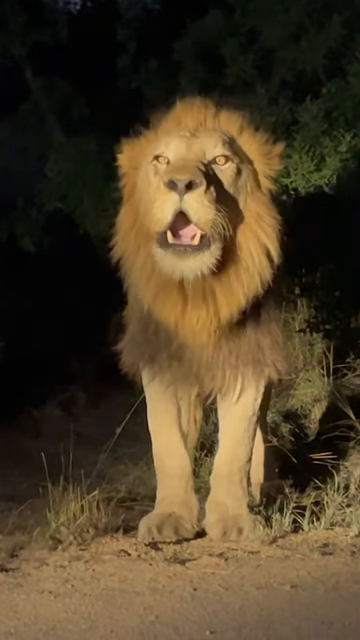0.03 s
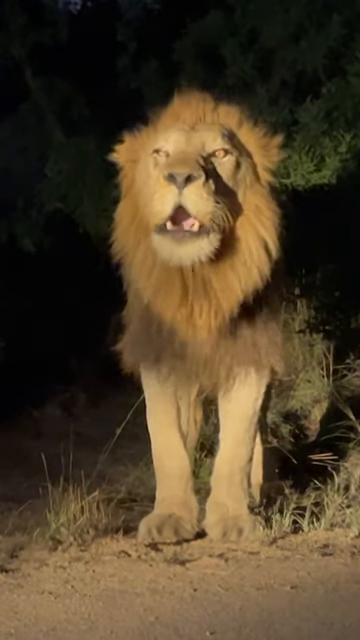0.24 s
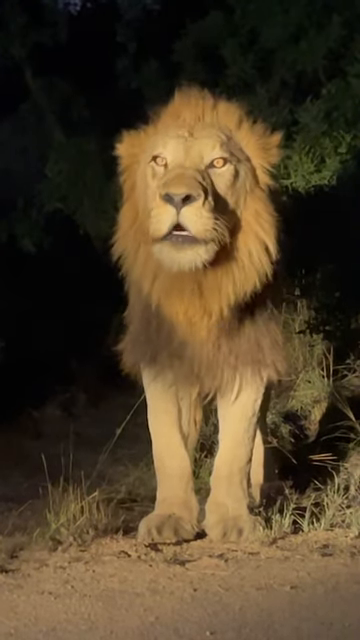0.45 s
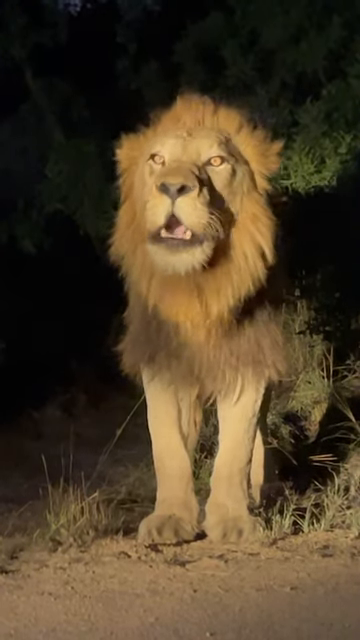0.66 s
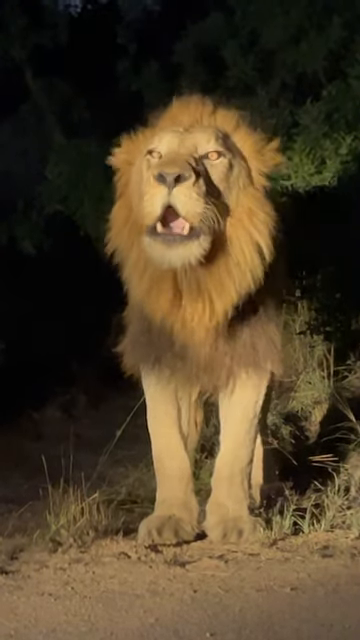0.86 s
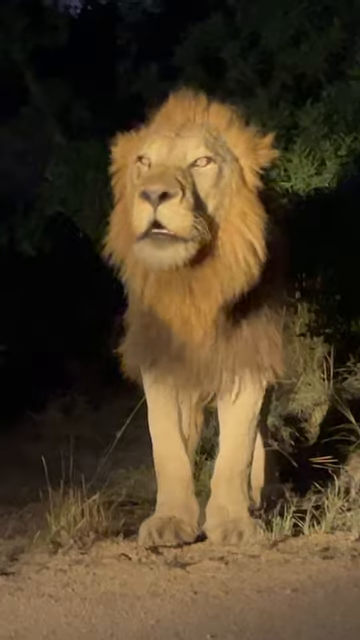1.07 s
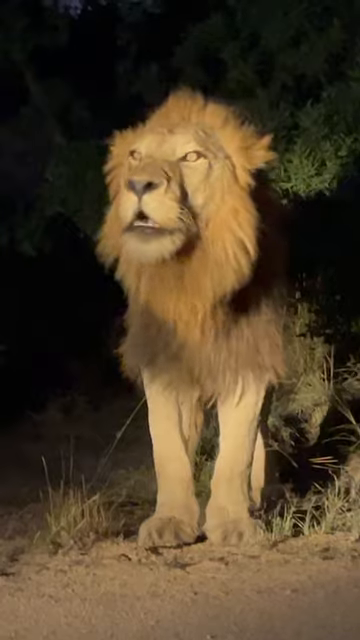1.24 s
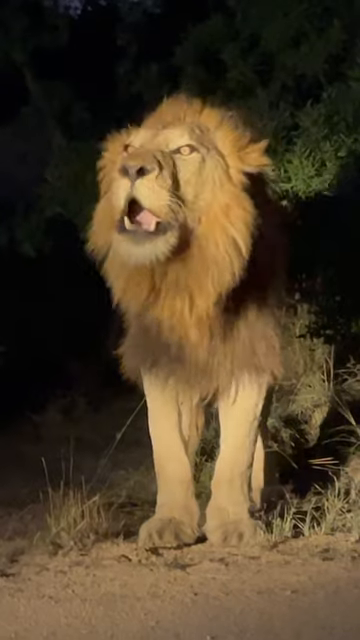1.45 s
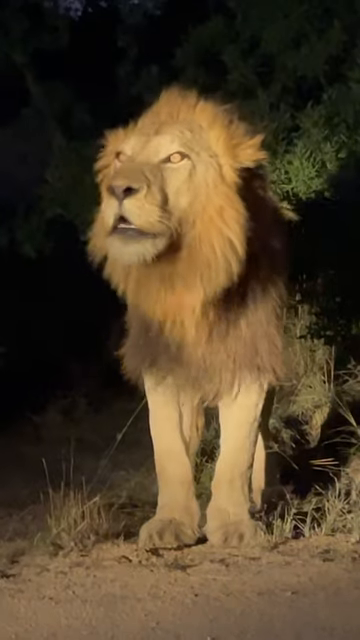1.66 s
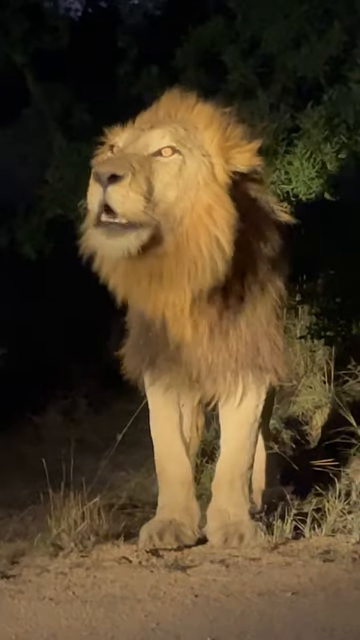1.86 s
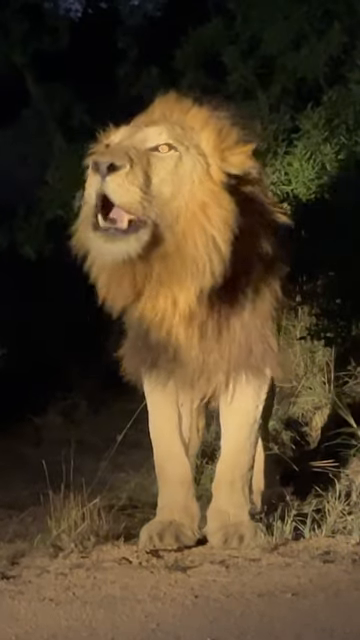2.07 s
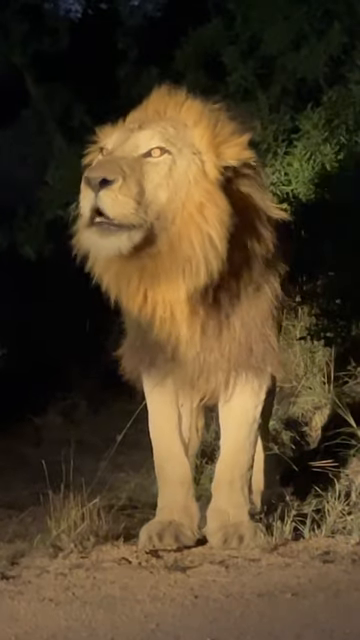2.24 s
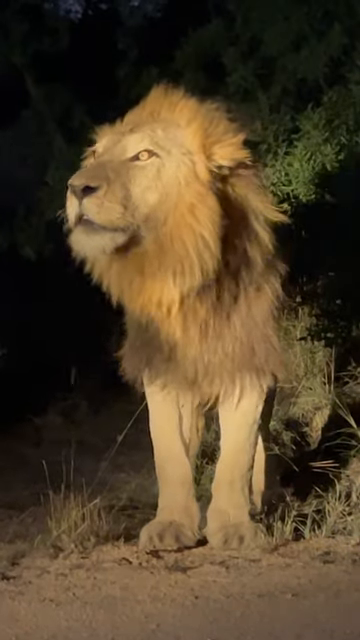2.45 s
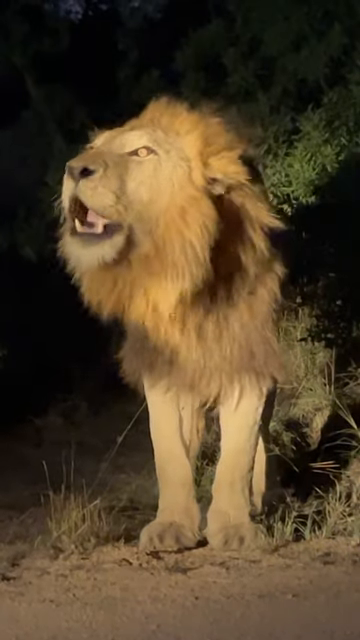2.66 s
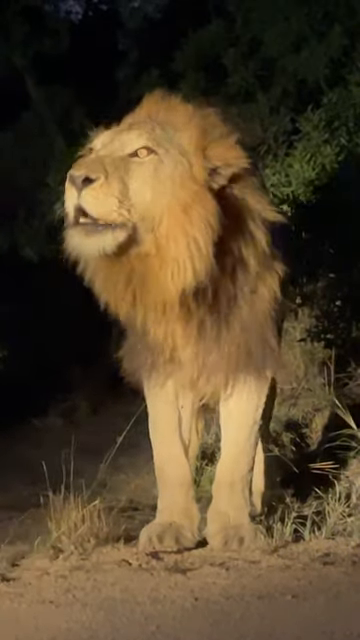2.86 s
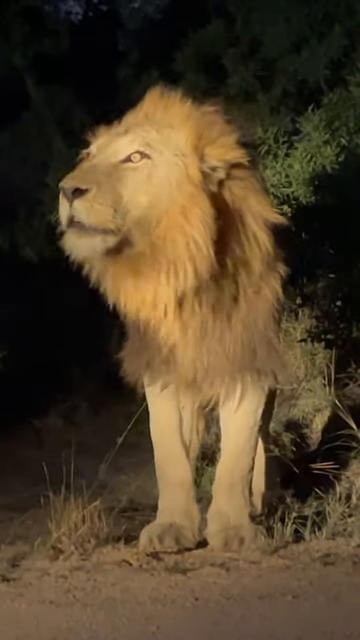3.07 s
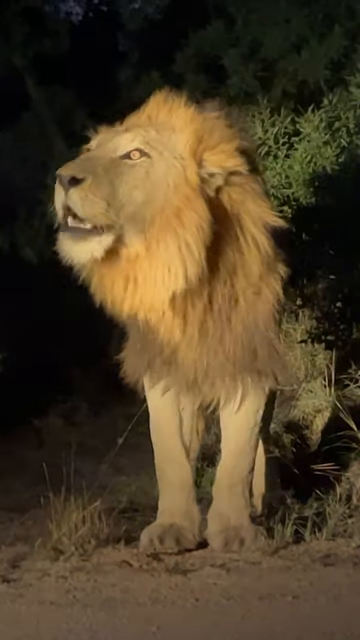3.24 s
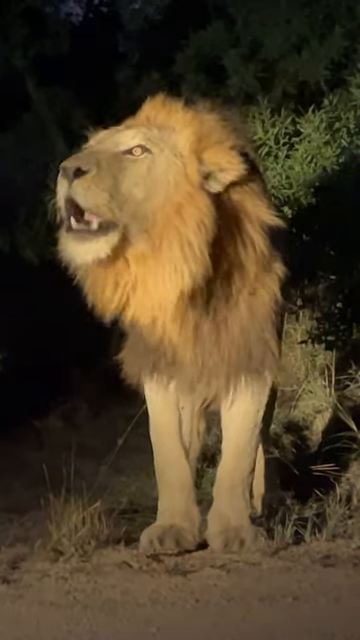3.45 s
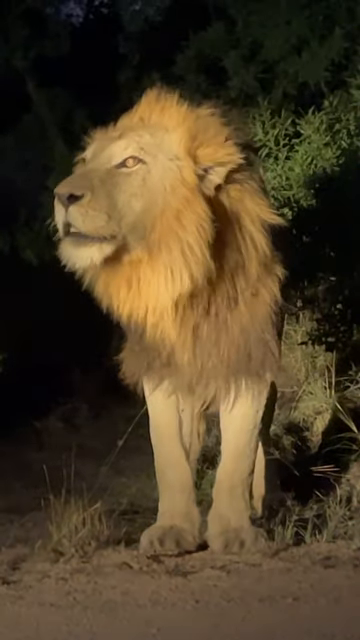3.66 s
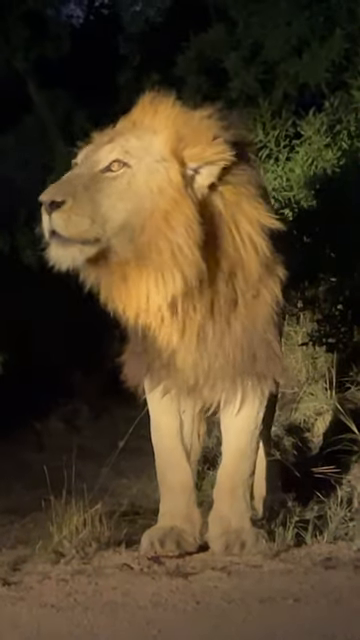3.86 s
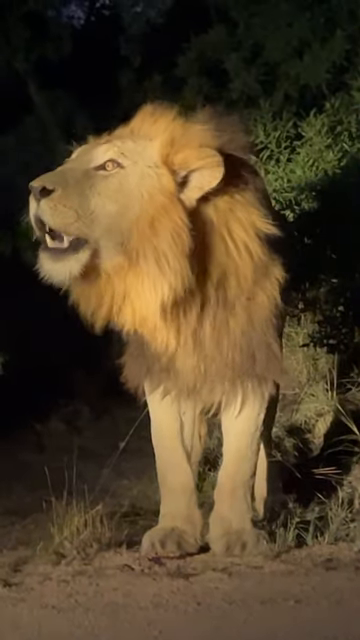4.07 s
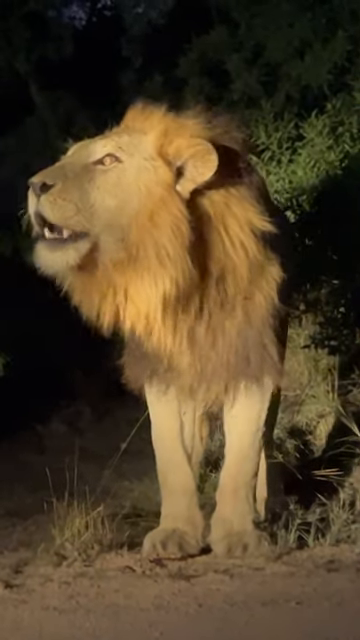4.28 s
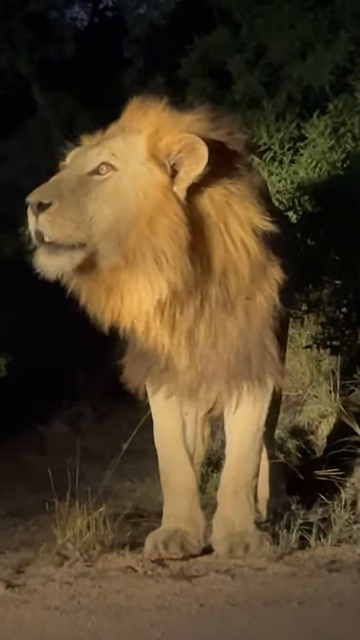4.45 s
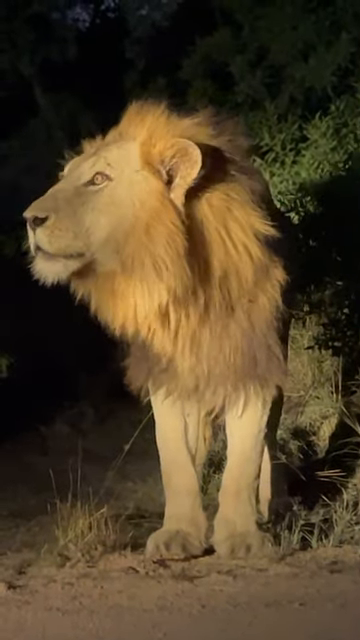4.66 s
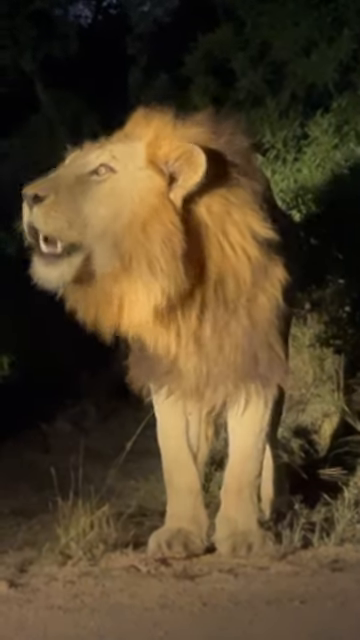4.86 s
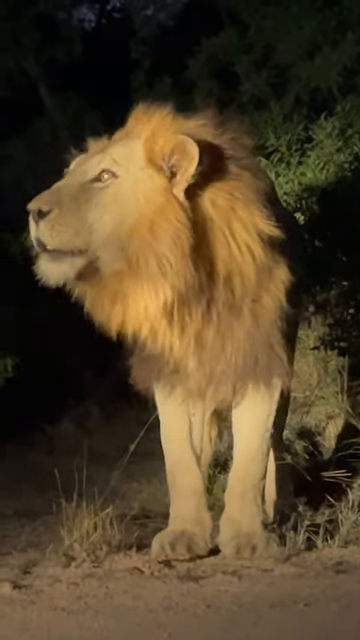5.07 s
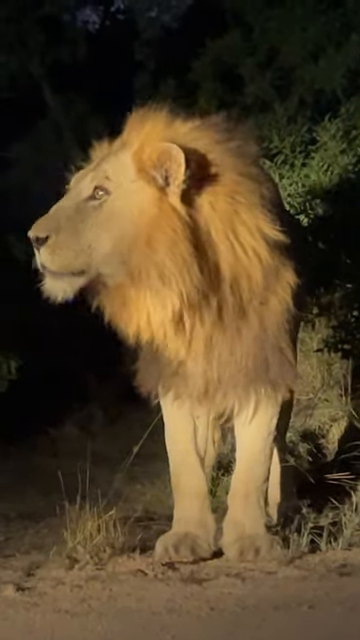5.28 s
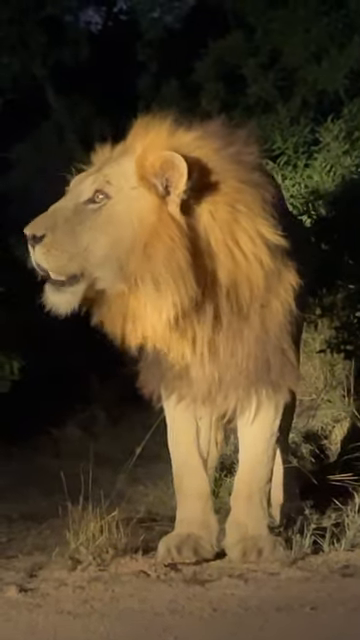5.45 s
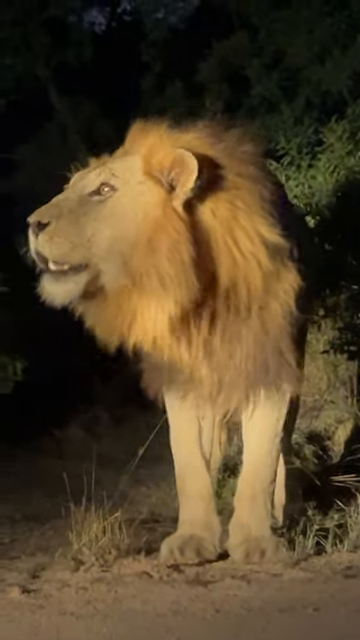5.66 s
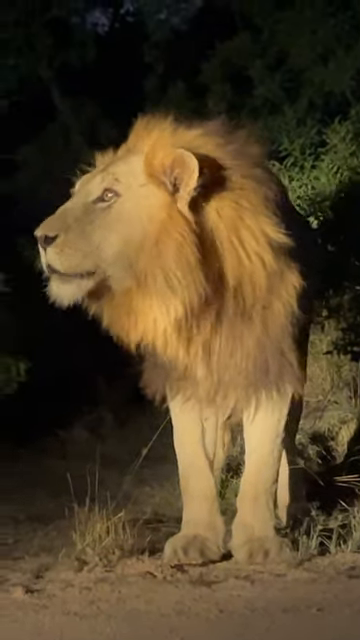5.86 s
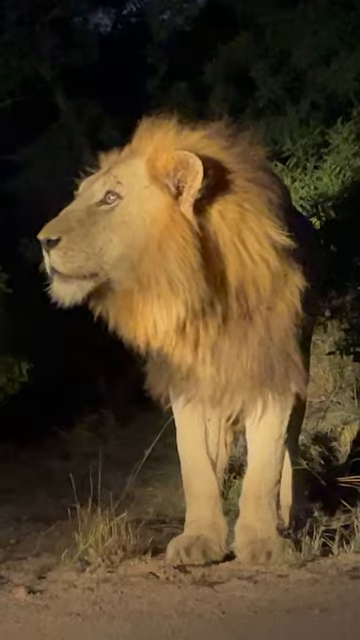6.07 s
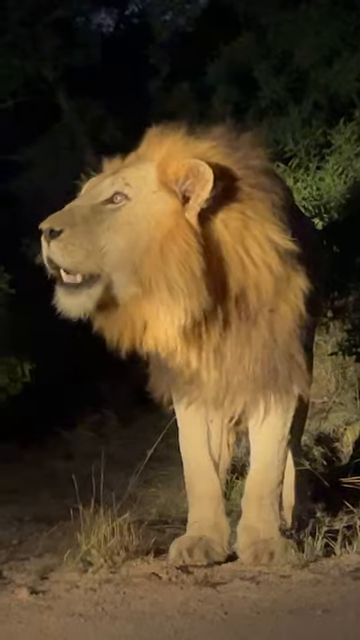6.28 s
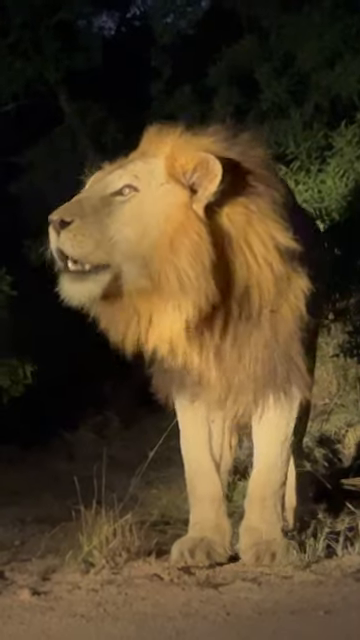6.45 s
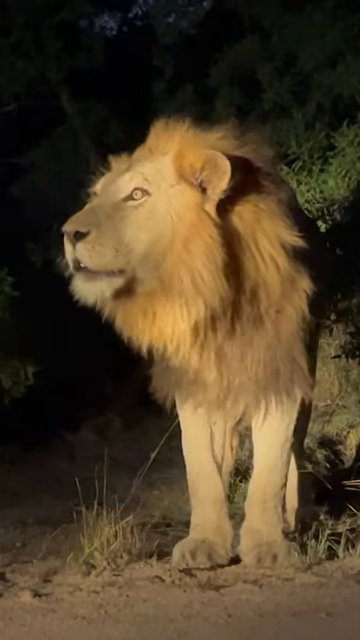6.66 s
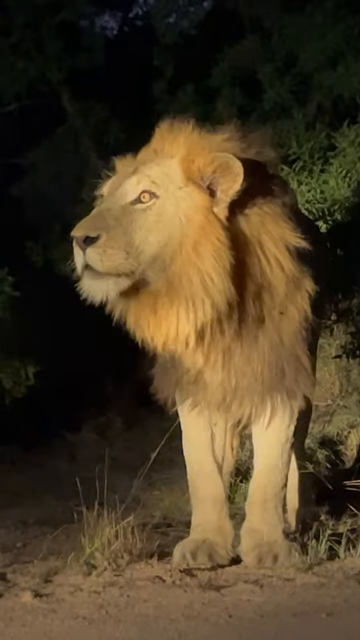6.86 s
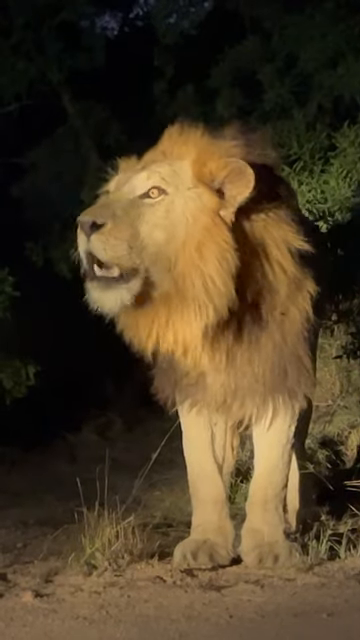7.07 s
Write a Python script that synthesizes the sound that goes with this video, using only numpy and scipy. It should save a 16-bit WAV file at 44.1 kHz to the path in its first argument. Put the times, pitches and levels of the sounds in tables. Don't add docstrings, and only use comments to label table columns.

```python
import sys
import numpy as np
from scipy import signal
from scipy.fft import rfft, irfft, next_fast_len
from scipy.io import wavfile
from scipy.ndimage import uniform_filter1d, minimum_filter1d

SR = 44100
rng = np.random.default_rng(int(sys.argv[2]) if len(sys.argv) > 2 else 0)


def volts_from_db(level):
    exponent = np.asarray(level, float) / 20
    return 10 ** exponent


def master(y):
    cut = np.clip(np.atleast_2d(y).T, -1, 1)
    pcm = np.round(cut * 32767)
    wavfile.write(sys.argv[1], SR, pcm.astype(np.int16))


N = 313992

TURN_S = 5.3
RELEASE_S = .09

# full voice at [s], push length [s], tail length [s], fold rate [Hz], push level [dB].
GRUNTS = [(0.102, 0.097, 0.14, 164, -2.5), (0.775, .086, 0.097, 159.7, -3.5),
          (1.391, 0.054, 0.11, 156, -4.5), (2.013, 0.064, 0.12, 161, -4), (2.682, 0.07, 0.13, 158, -3.5),
          (3.369, 0.088, 0.12, 158, -4), (4.166, .082, 0.16, 159.7, -0.5), (4.883, .065, .125, 150.2, -6),
          (5.582, .048, 0.089, 149, -7), (6.36, 0.058, 0.16, 147, -7.5), (7.135, 0.046, .12, 137, 0.5)]
# last gust of air at [s], gust level [dB], airflow of the push [dB],
# tail tone [dB], lingering rumble [dB].
LETTING_GO = [(0.25, -27, -17, -15, -44.5), (0.915, -26.5, -19.5, -13, -46.5),
              (1.486, -24.5, -18.5, -13.5, -53), (2.132, -26, -17, -13, -47.5),
              (2.818, -27, -19, -13.5, -48), (3.484, -25, -18, -13.5, -48), (4.302, -26, -17, -12.5, -43.5),
              (5.02, -34.5, -23, -16.5, -61), (5.71, -33.5, -27, -24.5, -57),
              (6.466, -29, -24.5, -24.5, -52), (7.24, -29, -26.5, -24, -49)]


def rms_one(x):
    return x / np.sqrt(np.mean(x ** 2) + 1e-20)


def evened(x, span_s):
    return x / np.sqrt(uniform_filter1d(x ** 2, int(span_s * SR)) + 1e-12)


def drift(rate_hz):
    r = np.exp(-2 * np.pi * rate_hz / SR)
    wander = signal.lfilter([1], [1, -2 * r, r * r], rng.standard_normal(N + SR))
    return rms_one(wander[SR:])


def at_hz(points, size):
    hz = np.maximum(np.arange(size // 2 + 1) * SR / size, 1)
    table_hz, values = np.array(points).T
    return np.interp(np.log(hz), np.log(table_hz), values)


def coloured(x, spectrum):
    size = next_fast_len(N)
    shaped = rfft(x, size) * volts_from_db(at_hz(spectrum, size))
    return rms_one(irfft(shaped, size)[..., :N])


def band_pass(x, low_hz, high_hz, order=3):
    return signal.sosfilt(signal.butter(order, [low_hz, high_hz], "band", fs=SR, output="sos"), x)


def resonances(x, modes, patchy_db):
    out = 0
    for k, (hz, width_hz, db) in enumerate(modes):
        r = np.exp(-np.pi * width_hz / SR)
        feedback = [1, -2 * r * np.cos(2 * np.pi * hz / SR), r * r]
        gain = (-1) ** k * volts_from_db(db + patchy_db * drift(7.9))
        out = out + gain * signal.lfilter([(1 - r * r) / 2, 0, (r * r - 1) / 2], feedback, x)
    return out


def in_time(tables, quiet):
    rows = []
    for table in tables:
        first, last = table[0], table[-1]
        before, after = [[v if q is None else q for v, q in zip(row[1:], quiet)] for row in (first, last)]
        rows += [(first[0] - .015, *before), *table, (last[0] + .03, *after)]
    s, *columns = np.transpose(rows)
    return [np.interp(np.arange(N) / SR, s, column) for column in columns]


def swells(times, peaks_db, rise_db_per_s, fall_db_per_s):
    late = np.arange(0, N + 64, 64)[:, None] / SR - times
    db = np.max(peaks_db + np.minimum(rise_db_per_s * late, -fall_db_per_s * late), axis=1)
    return volts_from_db(np.interp(np.arange(N) / 64, np.arange(len(db)), db))


def night():
    # frequency [Hz], level [dB per Hz].
    air_spectrum = [(25, -2.5), (85, -12), (170, -19), (800, -19.5), (1400, -40.5), (4500, -51.5),
                    (8000, -72), (11500, -53), (15000, -64)]
    air = volts_from_db(-69.5) * coloured(rng.standard_normal((2, N)), air_spectrum)
    wing_beat = np.sin(2 * np.pi * 70 * np.arange(N) / SR + 2 * drift(8))
    trill = (1 + .6 * wing_beat) * volts_from_db(1.8 * drift(8.5))
    cricket_hz = 6200
    chirps = band_pass(rng.standard_normal((2, N)), cricket_hz - 300, cricket_hz + 300)
    return air + volts_from_db(-71.5) * rms_one(trill * chirps)


def pauses():
    # peak at [s], air level [dB], rumble level [dB].
    breath_times = [(0.004, -51, -43), (0.658, -40, -42), (1.271, -41.5, -41.5), (1.876, -37.5, -39.5),
                    (2.555, -39.5, -41), (3.247, -39, -42.5), (4.024, -37, -38), (4.62, -74, -51),
                    (5.456, -53, -82), (6.231, -48, -58.5), (7.018, -52, -53)]
    # frequency [Hz], level [dB per Hz].
    breath_spectrum = [(150, -36.5), (250, -12.5), (552, -16.5), (642, -8), (1220, -17), (1390, -8.5),
                       (2020, -21), (3180, -27), (7900, -36), (8590, -40.5), (14000, -45.5)]
    # frequency [Hz], level [dB per Hz].
    rumble_spectrum = [(15, -52), (25, -23.5), (40, -5.5), (119, -2), (162, 4), (188, -12), (300, -25.5),
                       (390, -43.5), (660, -120)]
    # frequency [Hz], width [Hz], level [dB].
    windpipe = [(400, 60, -3.5), (590, 23, -2.5), (833, 110, -9), (1296, 220, -6), (2050, 1100, -25),
                (2800, 200, -2.5), (3150, 130, -9)]
    draw_db_per_s, stop_db_per_s = 273, 472
    s, air_db, stir_db = np.transpose(breath_times)
    ends = np.array([at + push + tail + RELEASE_S for at, push, tail, _, _ in GRUNTS])
    linger = swells(ends, np.transpose(LETTING_GO)[4], stop_db_per_s, 81.5)
    drawn = swells(s, air_db, stop_db_per_s, stop_db_per_s)
    drawn = drawn + swells(s - 0.034, air_db - 18, draw_db_per_s, draw_db_per_s)
    drawn = drawn + volts_from_db(-32) * linger + volts_from_db(-75)
    stirred = swells(s, stir_db, 175, 107.5) + linger
    air = coloured(rng.standard_normal(N) * volts_from_db(2.0 * drift(60)), breath_spectrum)
    breath = .55 * air + 2 * resonances(air, windpipe, 4.5)
    rumble = coloured(rng.standard_normal(N), rumble_spectrum)
    return drawn * evened(breath, 0.073) + stirred * evened(rumble, 0.07)


def ticks():
    # start [s], peak level [dB], low edge of its band [Hz].
    tick_list = [
        (2.744, -39, 7600),
        (4.149, -23.5, 300.3),
        (4.966, -17.5, 400),
        (7.11, -27.5, 400),
        (6.085, -31, 80),
        (6.135, -34.5, 80),
        (6.177, -32, 78.5),
    ]
    out, t = np.zeros(N + SR), np.arange(int(.07 * SR)) / SR
    for s, db, low_hz in tick_list:
        snap = volts_from_db(db - 60 * t / 0.012) * rng.standard_normal(len(t))
        at = int(s * SR)
        out[at:at + len(t)] += 4.7 * band_pass(snap, low_hz, min(3 * low_hz, 14000), order=2)
    return out[:N]


def slaps():
    # start [s], peak level [dB], chest thump against it [dB],
    # throat pitch [Hz].
    slap_list = [(0.501, -39, -11.5, 597), (4.573, -24, -22.5, 747), (4.659, 0, -5.5, 806),
                 (4.6985, -1.5, -6, 850), (4.784, -5, -3, 664), (4.823, -5, -3.5, 702),
                 (4.849, -7, -12, 740), (4.871, -10, 0, 579), (6.079, -57, -5, 653), (6.128, -54, -3, 628),
                 (6.175, -63, -6, 687)]
    # share of the throat pitch [ratio], level [dB], time to fall 60 dB [s].
    slap_modes = [(1.0, 8, 0.017), (0.59, -12, 0.02), (0.18, -14.5, 0.063), (0.71, -1.5, 0.014),
                  (1.25, -16, 0.033), (1.6, -20.5, .02), (2.3, -30, .015), (9.9, -30, .012)]
    out, t = np.zeros(N + SR), np.arange(int(.07 * SR)) / SR
    late = np.maximum(t - .006, 0)
    thump = np.sin(2 * np.pi * (58 * late + 1.22 * (1 - np.exp(-late / .016))) - .8)
    thump *= 1.3 * (1 - np.exp(-(late / .002) ** 2)) * np.exp(-late / .012)
    glide_s = 0.0052
    for s, db, thump_db, hz in slap_list:
        ring = sum(volts_from_db(level_db - 60 * t / t60) * np.sin(2 * np.pi * ratio * hz * t)
                   for ratio, level_db, t60 in slap_modes)
        glide = 126.7 * t + hz * glide_s * (1 - np.exp(-t / glide_s))
        ring += volts_from_db(-5.5 - 60 * t / 0.1) * np.sin(2 * np.pi * glide)
        crack = volts_from_db(-44 - 60 * t / 0.0051) * rng.standard_normal(len(t))
        onset = (1 - np.exp(-t / 0.0014)) ** 2
        at = int(s * SR)
        out[at:at + len(t)] += volts_from_db(db) * (ring * onset + crack + volts_from_db(thump_db + 3.5) * thump)
    return out[:N]


def voicing():
    tables = []
    for (s, push, tail, hz, db), (_, _, _, tail_db, _) in zip(GRUNTS, LETTING_GO):
        shut = s > TURN_S
        tired = s + push
        end = tired + tail
        tables.append([
            (s - .05, hz, db - 49),
            (s - 0.021, hz, db - 15 - 12 * shut),
            (s, hz, db - 3),
            (s + .026, hz, db),
            (s + .72 * push, .94 * hz, db - 3.4),
            (tired, .88 * hz, db - 2.5),
            (tired + .028, .75 * hz, tail_db - 1.5 - 4.5 * shut),
            (tired + .65 * tail, .67 * hz, tail_db),
            (end, .56 * hz, tail_db - 6),
            (end + .04, 80.8, tail_db - 16),
            (end + RELEASE_S, 80.8, tail_db - 47)])
    return tables


def airflow():
    tables = []
    for (s, push, tail, _, _), (gust, gust_db, flow_db, _, _) in zip(GRUNTS, LETTING_GO):
        shut = np.array([-37, 0, 4]) * (s > TURN_S)
        sag = max(s + push + tail, gust + 0.06)
        s = s - .014 * (s > TURN_S)
        stages = [
            (s - 0.048, flow_db, (-43.5, -52, -55)),
            (s - 0.035, flow_db, (-12, -20, -39.5)),
            (s, flow_db + shut / 2, (-4.5, -5, -21)),
            (s + 0.04, flow_db + shut, (-5.5, 0, -14.5)),
            (gust - 0.044, gust_db, (-0.5, 0, -9.5)),
            (gust, gust_db, (-0.87, 0, -5.5)),
            (gust + 0.018, gust_db, (-2.5, -4.5, -13.5)),
            (sag, gust_db, (-16, -15.5, -26.5)),
            (sag + RELEASE_S, gust_db, (-46.5, -43, -48))]
        tables.append([(at, *np.add(db, shares)) for at, db, shares in stages])
    return tables


def chest_tone(pitch_hz, cycle, effort, bright):
    # multiple of the fold rate [ratio], level under the chest tone [dB].
    clean_overtones = [(2, -31), (3, -20.5), (4, -30), (5, -23), (7, -31)]
    octave = 0.28 / (1 + ((2 * pitch_hz - 164) / 38) ** 2)
    swing = np.sin(2 * np.pi * cycle)
    swing = swing + octave * volts_from_db(3 * drift(19)) * np.sin(4 * np.pi * cycle + 1.8 * drift(14))
    flutter_spectrum = [(25, -22.5), (55, -5.5), (90, 0), (200, 4.5), (280, -40.5)]   # Hz, dB per Hz
    flutter = volts_from_db(-22.5) * coloured(rng.standard_normal(N), flutter_spectrum)
    chest = np.sqrt(2) * swing * volts_from_db((1.6 - 1.3 * effort) * drift(40)) + flutter
    for k, db in clean_overtones:
        level = np.sqrt(2) * volts_from_db(db + 4 * drift(18))
        chest = chest + bright * level * np.sin(2 * np.pi * k * cycle + 2.1 * k + .11 * k * drift(25))
    return chest


def throat_rasp(cycle, gate, effort, bright):
    # resonance [Hz], width [Hz], level [dB].
    throat_open = [(220, 76, -13.5), (357.2, 43, -1.5), (524, 79, -4.5), (587, 120, -5.5), (763, 150, -4),
                   (1031.3, 15, -1), (1340, 120, -7.5), (1584, 390, -19.5)]
    # resonance [Hz], width [Hz], level [dB].
    throat_shut = [(213, 60, 1.5), (376, 67.7, 1.5), (568.2, 41, -9.5), (863, 55, -8.5), (1034, 29, -5),
                   (1387.3, 270, -17.5), (1820, 190, -21)]
    start = rng.uniform(0, 2 * np.pi, 9)
    overtones = sum(np.sin(2 * np.pi * k * cycle + start[k] + .1 * k * drift(25)) / 2 for k in range(3, 8))
    source = (.05 + .34 * effort ** 2 - .22 * bright) * overtones + rms_one(gate * rng.standard_normal(N))
    facing = resonances(source, throat_open, 2.2)
    aside = resonances(source, throat_shut, 2.2)
    return np.where(np.arange(N) < TURN_S * SR, facing, aside)


def mouth_hiss(gate):
    # frequency [Hz], level [dB per Hz].
    hiss_spectrum = [(1120, -36), (1900, -6.5), (2250, -2), (2580, -2.5), (3540, -2), (4230, -14),
                     (4690, -13), (5450, -15), (6000, -17.5), (8020, -7.5), (8610, -34.5), (9480, -15.5),
                     (10600, -14.5), (12100, -19.5), (15500, -32)]
    # frequency [Hz], width [Hz], level [dB].
    mouth = [(2256, 31, 2), (2866, 230, -4.5), (2890, 39, -4.5), (3640, 410, -4), (3990, 180, -9),
             (4600, 350, 5.5), (5500, 450, -2.5), (7200, 83, -6)]
    spit = volts_from_db(3.5 * drift(250))
    pulsed = gate ** .55 * spit * rng.standard_normal(N)
    air = coloured(pulsed, [(1500, -59.5)] + hiss_spectrum)
    return evened(air + 1.27 * resonances(air, mouth, 5.8), .05)


def grunts():
    pitch_hz, chest_db = in_time(voicing(), [None, -90])
    low_db, high_db, hiss_db = in_time(airflow(), [-90, -90, -90])
    effort = np.clip((chest_db + 17) / 10, 0, 1)
    bright = effort ** 2 * (np.arange(N) < TURN_S * SR)
    cycle = np.cumsum(pitch_hz * (1 + (.03 - .022 * effort) * drift(40))) / SR
    chest = chest_tone(pitch_hz, cycle, effort, bright)
    gate = np.exp(-1.0 * (cycle % 1)) * volts_from_db(2.0 * drift(34))
    rasp = throat_rasp(cycle, gate, effort, bright)
    low_rasp = evened(band_pass(rasp, 190, 620), 0.099)
    high_rasp = evened(band_pass(rasp, 620, 1900), 0.099)
    voice = volts_from_db(chest_db) * chest
    voice = voice + volts_from_db(low_db - 0.3 * bright) * low_rasp + volts_from_db(high_db - 0.35 * bright) * high_rasp
    return voice + volts_from_db(hiss_db) * mouth_hiss(gate)


def ports(x):
    # frequency [Hz], level [dB].
    scatter = [(25, -14), (95, -14), (150, -13.5), (300, -19), (700, -9), (1290, -10), (2380, -11),
               (4400, -9), (8000, -9), (15000, -9)]
    # frequency [Hz], phase lead [rad].
    port_phase = [(60, 0), (4100, 0), (6200, -.9), (8000, -2.7), (10500, -4.1), (12000, -5.5),
                  (16000, -6.3)]
    size, t = next_fast_len(N + SR), np.arange(SR // 4) / SR
    echoes = rfft(rng.standard_normal(len(t)) * volts_from_db(-60 * t / .045), size).imag
    evened_echoes = echoes / np.sqrt(uniform_filter1d(echoes ** 2, size // 400))
    side = evened_echoes * volts_from_db(at_hz(scatter, size))
    turn = np.exp(.5j * at_hz(port_phase, size)) * (1 + 1j * side)
    return irfft(rfft(x, size) * np.array([turn, turn.conj()]), size)[:, :N]


def scene():
    lion = grunts() + slaps() + ticks() + pauses()
    return ports(lion) + night()


def top_cut(x):
    return signal.sosfilt(signal.butter(12, 15720, fs=SR, output="sos"), x)


def record(dry):
    port_notch_hz = [8450, 9350]
    notched = signal.sosfilt(signal.butter(2, port_notch_hz, "bandstop", fs=SR, output="sos"), dry)
    span = int(.012 * SR)
    crest = -minimum_filter1d(-np.abs(notched).max(axis=0), span)
    turned_down = notched * uniform_filter1d(np.minimum(1, volts_from_db(-.6) / (crest + 1e-9)), span)
    limited = turned_down / (1 + np.abs(turned_down / .93) ** 8) ** (1 / 8)
    return top_cut(limited)


dry = scene()
out = record(dry)
master(out)
```